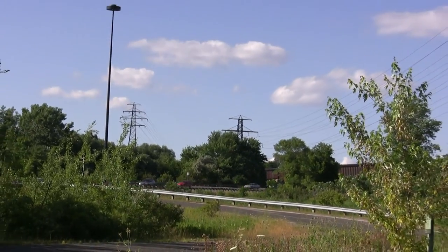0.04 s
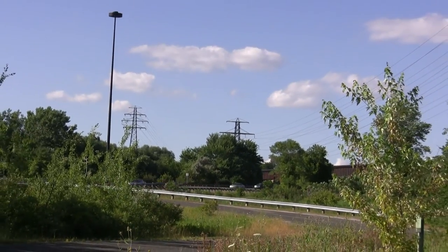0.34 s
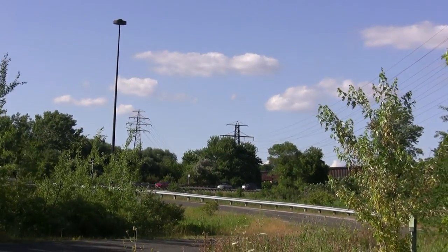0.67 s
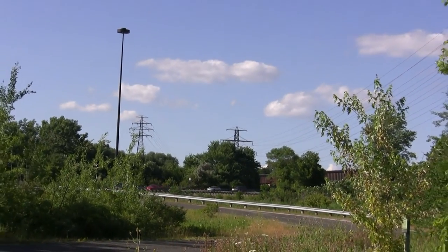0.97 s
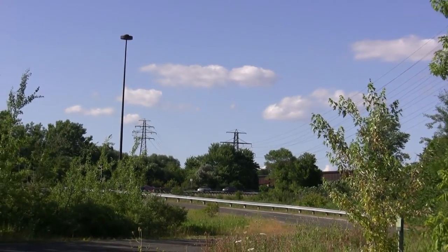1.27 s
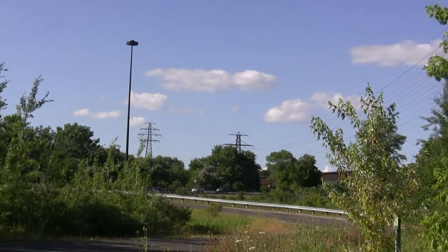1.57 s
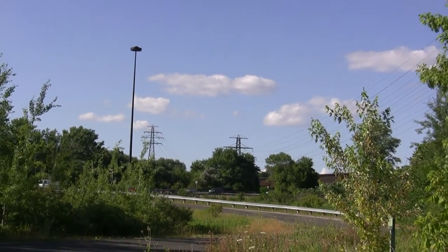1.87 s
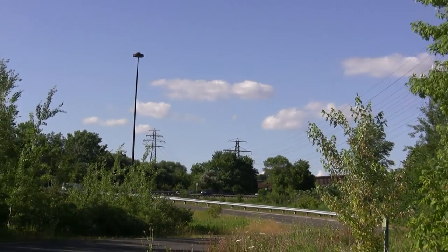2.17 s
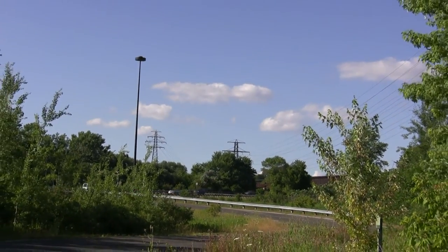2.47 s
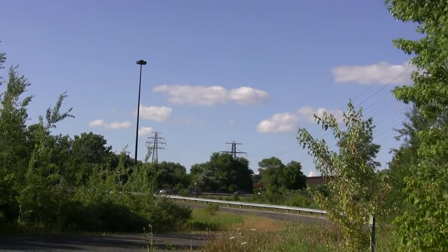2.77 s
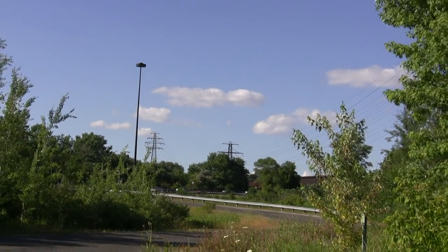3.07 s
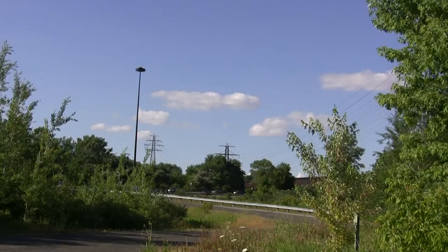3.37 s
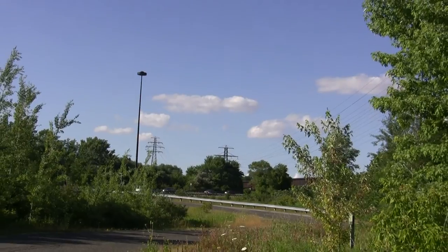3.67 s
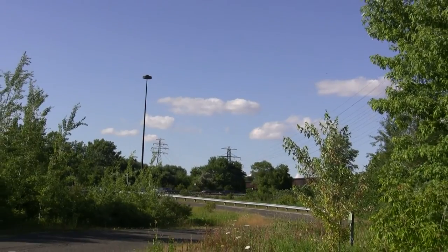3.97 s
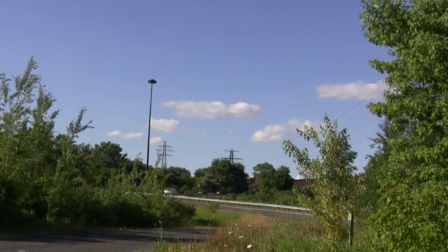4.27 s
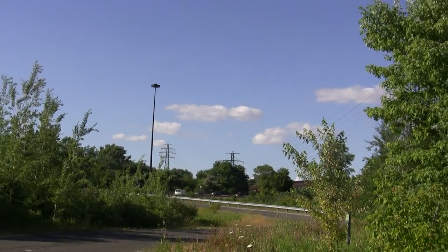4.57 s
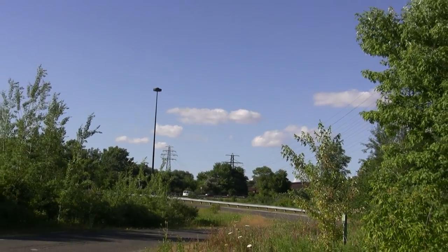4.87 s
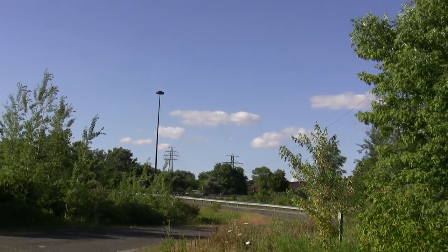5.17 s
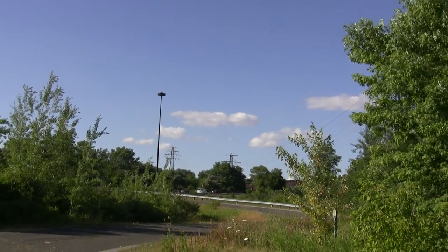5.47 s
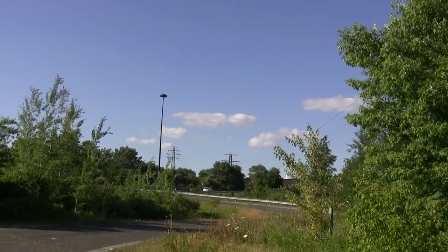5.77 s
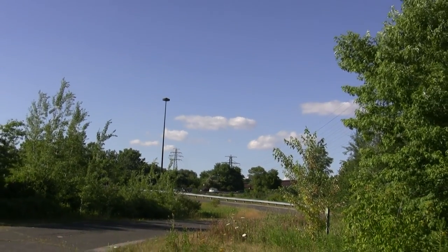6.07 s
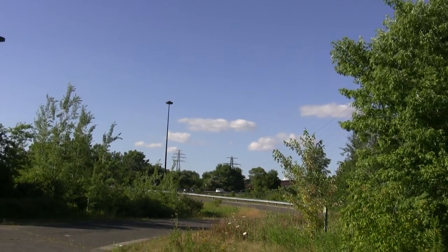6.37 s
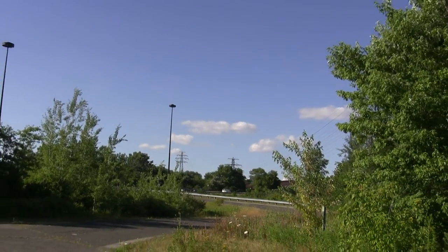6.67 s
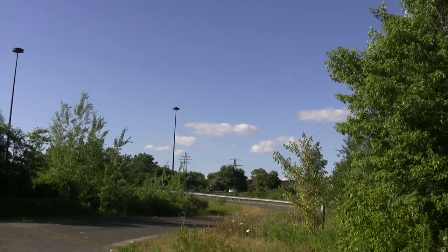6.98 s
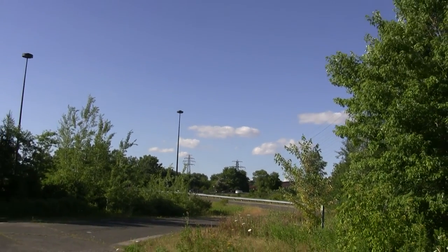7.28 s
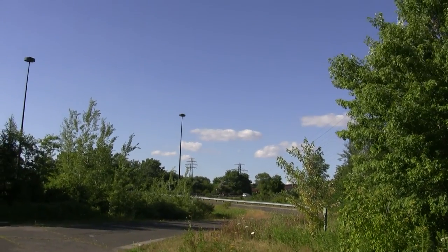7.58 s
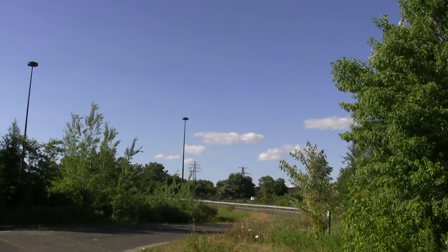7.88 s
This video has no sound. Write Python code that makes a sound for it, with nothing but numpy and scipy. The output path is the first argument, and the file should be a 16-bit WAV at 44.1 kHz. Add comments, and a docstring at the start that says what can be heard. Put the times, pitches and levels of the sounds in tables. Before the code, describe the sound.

From a grassy roadside, many tyres and engines blend into a wide, continuous roar with mild swells. A thin, pulsing cricket trill runs above it, pausing briefly twice, while a faint high fizz fades away. Early on, two distant bird whistles are followed by a clearer three-note falling chirp. Three quick knocks of wheels crossing a road joint follow, then the traffic rolls on.

```python
"""A highway heard across a grassy verge on a summer day. From the start, many tyres merge into a roar over
the rumble and drone of engines, swelling as vehicles pass, while a faint high fizz slowly fades. Almost
at once a cricket begins the first of three long trills, one ringing pulse to each wing stroke. Two thin
whistles come from the trees (0.6 s, 2.2 s), then a small bird gives one short falling phrase (2.7 s).
Just after 4 s wheels knock three times over a road joint; traffic and cricket carry on to the end."""
import sys
import numpy as np
from scipy import signal
from scipy.fft import rfft, irfft, next_fast_len
from scipy.io import wavfile
from scipy.ndimage import uniform_filter1d

SR = 44100
rng = np.random.default_rng(int(sys.argv[2]) if len(sys.argv) > 2 else 0)


def wrap_up_sound(samples):
    """Save the sound to the file named by the first command line argument, as 16-bit audio."""
    columns = np.atleast_2d(samples).T
    # keep every value between -1 and 1, then stretch to whole-number steps
    tamed = np.clip(columns, -1, 1)
    steps = np.round(tamed * 32767).astype(np.int16)
    wavfile.write(sys.argv[1], SR, steps)


N = 354123
TIME = np.arange(N) / SR
# how busy the road sounds: (time [s], whole-stream gain [dB], near-lane gain [dB])
TRAFFIC = [(0, -.5, 0.2), (.7, 1.26, 3), (1.3, 0.8, 1), (1.8, 0.8, 1.8), (2.4, 0.7, 1.7), (2.95, -0.4, -1),
           (3.5, -0.25, -0.4), (4.6, 0.04, -0.2), (5.55, -0.6, -1.0), (6.4, -1.0, -0.3), (7.3, -1.1, -0.8),
           (8.03, -0.3, -.9)]


def gain_of(db):
    """Amplitude ratio of a level in decibels."""
    return 10 ** (np.asarray(db) / 20)


def unit_rms(x):
    """Normalisation to an rms of one."""
    return x / np.sqrt(np.mean(x ** 2) + 1e-20)


def at_frequency(points, hz):
    """Interpolation on a logarithmic frequency axis."""
    f, value = np.transpose(points)
    return np.interp(np.log(hz + 1), np.log(f + 1), value)


def envelope(rows, column=1):
    """Amplitude over time, interpolated in decibels."""
    rows = np.asarray(rows)
    return gain_of(np.interp(TIME, rows[:, 0], rows[:, column]))


def add(mix, start, sound):
    """Superposition: a sound joins the mix at its start time."""
    part = mix[max(round(start * SR), 0):][:len(sound)]
    part += sound[:len(part)]


def wander(rate_hz):
    """Slow random modulation: low-passed noise with an rms of one."""
    hz = np.fft.rfftfreq(N, 1 / SR)
    return unit_rms(irfft(rfft(rng.standard_normal(N)) * np.exp(-(hz / rate_hz) ** 2), N))


def swell(peak_time, length):
    """Screening: the level rises and falls as a vehicle comes into the open and is hidden again."""
    return np.cos(np.pi * np.clip((TIME - peak_time) / length, -.5, .5)) ** 2


def wash(spectrum, patchy_db):
    """An extended source gives partly coherent stereo noise; moving air makes patches swell and fade."""
    # likeness of the channels: (frequency [Hz], coherence [ratio, capped at 1 below])
    likeness = [(40, 1.5), (300, 1.1), (750, 0.93), (1000, 0.79), (1250, 0.84), (1900, 0.57), (2400, 0.62),
                (3200, 0.4), (4300, 0), (15000, 0.14)]
    # lead of left over right: (frequency [Hz], phase [rad])
    phase_lead = [(40, 0.98), (90, 0.68), (180, 0.39), (400, 0.42), (750, -0.045), (1000, -0.051),
                  (1600, 0.051), (3300, -0.38), (4500, -1.36), (10000, -1.5), (14000, -.1)]
    # left minus right: (frequency [Hz], level difference [dB])
    balance = [(30, -2), (80, -0.24), (180, 1.3), (700, 1.7), (1300, 0.4), (2400, -1), (5000, -0.13),
               (15000, -0.66)]
    frames, hz = N // 512 + 5, np.fft.rfftfreq(2048, 1 / SR)
    a, b, c, d, patches = rng.standard_normal((5, frames, len(hz)))
    left, independent = a + 1j * b, c + 1j * d
    patches = uniform_filter1d(patches, size=14, axis=0)  # smooth over time
    patches = unit_rms(uniform_filter1d(patches, size=12, axis=1))  # and over frequency
    coherence = np.clip(at_frequency(likeness, hz), 0, 1)
    right = coherence * left + np.sqrt(1 - coherence ** 2) * independent
    right *= np.exp(-1j * at_frequency(phase_lead, hz))
    lean = gain_of(at_frequency(balance, hz) / 2)
    roll_off = 1 / (1 + (hz / spectrum[-1][0] / 2) ** 4)
    colour = roll_off * gain_of(at_frequency(spectrum, hz) + patchy_db * patches)
    bins = np.array([left * lean, right / lean]) * colour
    noise = signal.istft(bins.swapaxes(1, 2), nperseg=2048, noverlap=1536)[1][:, :N]
    return noise / np.std(noise.mean(0))


def place(x, balance_db, lead_rad):
    """A point source reaches the channels with a level and a phase difference, left minus right."""
    lean = gain_of(balance_db / 2) * np.exp(.5j * lead_rad)
    analytic = signal.hilbert(x, next_fast_len(N + SR))[:N]
    return (analytic * np.array([[lean], [1 / lean]])).real


def scatter(x, t60):
    """Scattering: leaves and trunks return sparse, dying echoes, different in each channel."""
    t = np.arange(SR) / SR
    echoes = rng.standard_normal((2, SR)) * (rng.random((2, SR)) < 1500 / SR)  # about 1500 a second
    echoes *= gain_of(-60 * t / t60) * (t > .006)
    echoes /= np.linalg.norm(echoes, axis=1, keepdims=True)
    return signal.fftconvolve(x[None], echoes, axes=1)[:, :N]


def tone(times, hz, db):
    """A pure glide, whose phase is the integral of frequency; returns its start time and samples."""
    t = np.arange(times[0], times[-1], 1 / SR)
    turns = np.cumsum(np.interp(t, times, hz)) / SR
    return times[0], np.sqrt(2) * gain_of(np.interp(t, times, db)) * np.sin(2 * np.pi * turns)


def note(start, length, db, pitch):
    """A glide under one rounded envelope; pitch(u) gives Hz as u runs from 0 to 1 through the note."""
    u = np.linspace(0, 1, 32)
    puff_db = 10 * np.log10(np.sin(np.pi * u) + 1e-4)
    return tone(start + length * u, pitch(u), db + puff_db)


def tyres(roar_db=-33, hiss_db=-46.5):
    """Incoherent sources add in power: tyres merge into a roar, and the near lanes add a hiss."""
    # spectra of all tyres and of the near lanes: (frequency [Hz], relative density [dB])
    roar_spectrum = [(100, -27), (250, -10), (350, -3.5), (450, -4), (560, -2), (680, 0), (830, -0.5),
                     (970, -1.5), (1190, -1.5), (1450, -8), (1800, -15), (2400, -31), (4000, -49)]
    hiss_spectrum = [(800, -14.5), (1400, -1), (1850, 1.5), (2400, -3.5), (2800, -8), (3800, -13.5),
                     (5000, -20), (7000, -25), (10000, -29.5), (16000, -42)]
    # cars heard through a gap in the bushes: (peak time [s], duration [s], level [dB])
    cars = [(1.0, .5, -44), (2.697, 0.32, -36), (4.304, 0.41, -40), (7.0, 1, -42)]
    passing = sum(gain_of(db) * swell(peak_time, length) for peak_time, length, db in cars)
    roar = np.hypot(gain_of(roar_db) * envelope(TRAFFIC), passing) * wash(roar_spectrum, patchy_db=0.7)
    hiss = gain_of(hiss_db) * envelope(TRAFFIC, column=2) * wash(hiss_spectrum, patchy_db=0.86)
    return roar + hiss


def high_fizz():
    """Modulated noise: a faint high fizz, perhaps rustling leaves, slowly fades."""
    # spectrum of the fizz: (frequency [Hz], relative density [dB])
    spectrum = [(3000, -14), (4200, -1.5), (5600, -1.5), (7000, -4.5), (10000, -10), (15000, -22)]
    # its fade: (time [s], level [dB])
    fade = [(0, -62), (2.6, -64.6), (3.3, -67.5), (5.5, -68.5), (8.03, -72)]
    return envelope(fade) * wash(spectrum, patchy_db=2.0)


def engines(rumble_db=-41.5, drone_db=-40, surge_db=0.1, waver=0.011, flutter_db=2.2, body_db=-4.0):
    """Tones over band noise: each heavy engine adds a wavering note and lifts the rumble or the drone."""
    # spectra of exhaust rumble and engine drone: (frequency [Hz], relative density [dB])
    rumble_spectrum = [(15, -33), (30, -15), (48, -5.5), (62, -1), (85, 0), (100, -4.5), (125, -3.5),
                       (160, -11.5), (260, -31)]
    drone_spectrum = [(80, -31), (135, -7.5), (170, -2.5), (200, -4), (255, -1.5), (280, -5), (305, -5),
                      (350, -13.5), (600, -30)]
    # heavy vehicles that stand out: (peak time [s], duration [s], engine note [Hz], level [dB])
    trucks = [(.5, .6, 296, -42), (.65, .9, 109.5, -43.5), (1.17, .3, 175, -39.5),
              (1.26, .55, 106.7, -36.5), (1.42, .5, 240, -36.5), (1.48, 0.39, 214, -42),
              (2.2, .9, 108.6, -45.5), (2.702, 0.59, 252, -40.5), (3.25, .55, 230, -41.5),
              (3.543, 0.27, 250.8, -39), (4.3, .55, 62, -45), (4.551, 0.76, 252, -43),
              (4.7, .76, 90, -42.5), (5.781, 0.33, 166, -42), (7.0, 1.8, 88, -44), (7.2, 2.4, 61, -47),
              (7.3, 0.89, 238.6, -40)]
    notes, rumble_lift, drone_lift = np.zeros((3, N))
    sway, flutter = wander(rate_hz=6.7), wander(rate_hz=7.2)
    for peak_time, length, hz, db in trucks:
        shift = rng.integers(N)  # every engine wavers in its own way
        amplitude = gain_of(db) * swell(peak_time, length)
        turns = np.cumsum(hz * (1 + waver * np.roll(sway, shift))) / SR
        notes += amplitude * gain_of(flutter_db * np.roll(flutter, shift)) * np.sin(2 * np.pi * turns)
        add(rumble_lift if hz < 140 else drone_lift, 0, gain_of(body_db) * amplitude)
    rumble_bed = gain_of(rumble_db + surge_db * wander(rate_hz=3.4))
    rumble = np.hypot(rumble_bed, rumble_lift) * wash(rumble_spectrum, patchy_db=0.15)
    drone_bed = gain_of(drone_db + surge_db * wander(rate_hz=3.3)) * envelope(TRAFFIC) ** 1.06
    drone = np.hypot(drone_bed, drone_lift) * wash(drone_spectrum, patchy_db=0.6)
    return rumble + drone + place(notes, balance_db=2.0, lead_rad=0.28)


def faint_hiss():
    """Stationary broadband noise lays a faint floor under the treble."""
    # spectrum of the hiss: (frequency [Hz], relative density [dB])
    spectrum = [(1500, -13), (4000, -1), (7000, -1), (10000, -2), (13000, -0.5), (15700, -4.5)]
    return gain_of(-68) * wash(spectrum, patchy_db=0)


def cricket(start_hz=8200, full_hz=8620, pitch_jitter=0.002, uneven_db=1.2, settle_strokes=12):
    """Stridulation: each wing stroke rings briefly; a run starts quick, short and low, then settles."""
    # runs: (start [s], end [s], first period [s], settled period [s],
    # time constant of the pitch climb [strokes], relative level [dB])
    trills = [(0.1997, 2.99, 0.05272, 0.05932, 4.0, -54.5), (3.487, 5.61, 0.05503, 0.05734, 7.5, -55),
              (5.9579, 8.0, 0.05304, 0.05955, 3.8, -53.5)]
    # the wing slows as it closes: (time from mid-stroke [s], pitch factor [ratio], relative level [dB])
    stroke = [(-.014, .98, -22), (-.009, .99, -7), (-.002, 1.002, 0), (.001, .988, -1), (.003, .968, 2),
              (.005, .93, -3), (.0085, .89, -16)]
    offset, bend, shape_db = np.transpose(stroke)
    song = np.zeros(N)
    for at, end, first_period, settled_period, climb_strokes, db in trills:
        count = 0
        while at < end:
            pitch = full_hz + (start_hz - full_hz) * np.exp(-count / climb_strokes)
            pitch *= 1 + pitch_jitter * rng.standard_normal()
            stroke_db = db + uneven_db * rng.standard_normal()
            reach = np.interp(count, [0, 4], [0.54, 1])  # the first four strokes are shorter
            add(song, *tone(at + reach * offset, pitch * bend, stroke_db + shape_db))
            at += settled_period + (first_period - settled_period) * np.exp(-count / settle_strokes)
            count += 1
    direct = place(song, balance_db=-4.0, lead_rad=-1.72)
    return gain_of(-4.4) * (direct + gain_of(-7.5) * scatter(song, t60=.12))


def far_whistles(arch=.035):
    """Reverberation: thin, arched whistles from the trees carry nearly as much echo as direct sound."""
    # whistles: (start [s], duration [s], top pitch [Hz], relative level [dB])
    whistles = [(.64, .31, 7130, -65.5), (2.2, .42, 7330, -65)]
    song = np.zeros(N)
    for start, length, top_hz, db in whistles:
        add(song, *note(start, length, db, lambda u: top_hz * (1 - arch * (2 * u - 1) ** 2)))
    direct = place(song, balance_db=-1.5, lead_rad=1.1)
    return gain_of(-6) * (direct + gain_of(-1) * scatter(song, t60=.4))


def small_bird(flick_s=.011, flick_rise=.09, fall_hz_per_s=12400, echo_s=.049, echo_db=-6.5):
    """Frequency sweeps form three falling syllables on the right; the low notes echo among the trees."""
    # upward flick that opens each syllable: (start [s], top pitch [Hz], relative level [dB])
    flicks = [(2.717, 6250, -49.5), (2.845, 6170, -42), (2.96, 5670, -39)]
    # slur after it: (start [s], duration [s], first pitch [Hz], last pitch [Hz], relative level [dB])
    slurs = [(2.738, 0.047, 5050, 4690, -37), (2.873, 0.033, 4830, 4650, -37.5),
             (2.997, .07, 4530, 4280, -37.3)]
    song = np.zeros(N)
    for start, top_hz, db in flicks:
        add(song, *note(start, flick_s, db, lambda u: top_hz * (1 - flick_rise * (1 - u) ** 3)))
    for start, length, first_hz, last_hz, db in slurs:
        fall_hz = fall_hz_per_s * length
        add(song, *note(start, length, db, lambda u: np.maximum(first_hz - fall_hz * u, last_hz)))
    low_notes = signal.sosfilt(signal.butter(6, 5000, fs=SR, output="sos"), song)
    add(song, echo_s, gain_of(echo_db) * low_notes)  # one reflection from the tree line
    phrase = place(song, balance_db=-8.0, lead_rad=-2.65) + gain_of(-8.5) * scatter(song, t60=0.22)
    lingering = gain_of(-8) * scatter(low_notes, t60=1.4)
    return gain_of(-5.0) * (phrase + lingering)


def joint_knocks(decay_s=0.0041, slap_gap_s=0.00442, log_bandwidth=0.24):
    """Impact noise: wheels crossing a road joint give pairs of short, damped bursts of band noise."""
    # knocks: (time [s], peak level of a slap [dB], centre frequency [Hz])
    knocks = [(4.1446, -22.5, 950), (4.212, -27, 774), (4.298, -24, 880)]
    slaps, t = np.zeros(N), np.arange(2048) / SR
    hz = np.fft.rfftfreq(len(t), 1 / SR)
    for start, db, centre_hz in knocks:
        band = np.exp(-.5 * (np.log((hz + 1) / centre_hz) / log_bandwidth) ** 2)
        for delay in (0, slap_gap_s):
            noise = irfft(rfft(rng.standard_normal(len(t))) * band)
            slap = noise * t * np.exp(-2 * t / decay_s)
            add(slaps, start + delay, gain_of(db) * slap / abs(slap).max())
    return place(slaps, balance_db=2.0, lead_rad=0) + gain_of(-12) * scatter(slaps, t60=.4)


def scene():
    """Superposition: the pressures of all sources add."""
    background = tyres() + high_fizz() + engines() + faint_hiss()
    return background + cricket() + far_whistles() + small_bird() + joint_knocks()


def record(dry):
    """Band limiting: a steep low-pass filter removes the highest treble."""
    edge_hz = 15750
    low_pass = signal.firwin(1023, edge_hz, window=("kaiser", 9), fs=SR)
    return signal.oaconvolve(dry, low_pass[None], "same")


dry = scene()
out = record(dry)
wrap_up_sound(out)
```